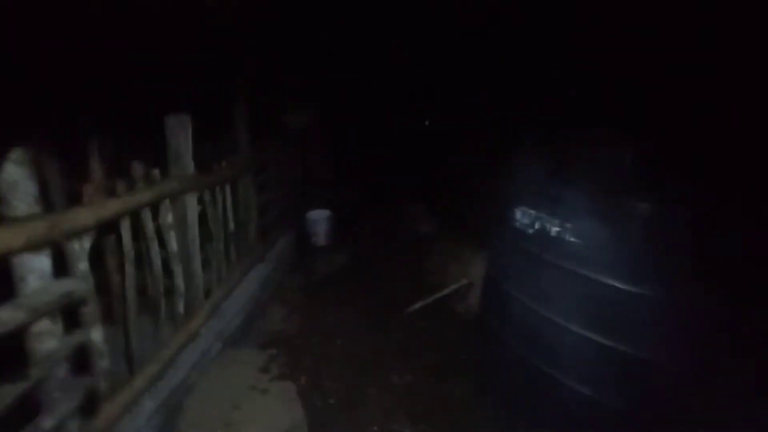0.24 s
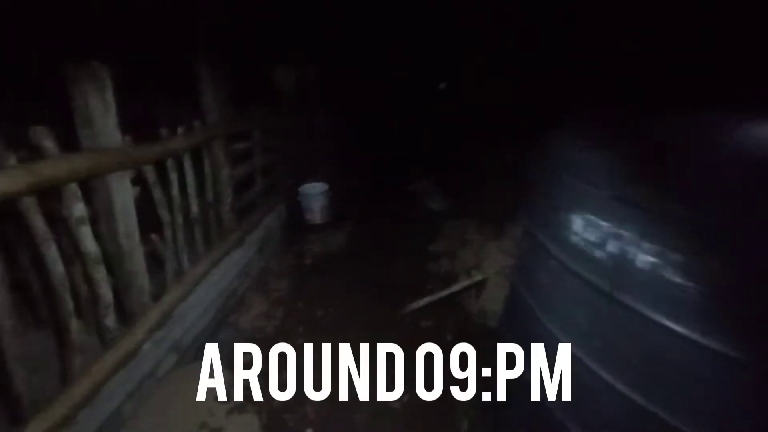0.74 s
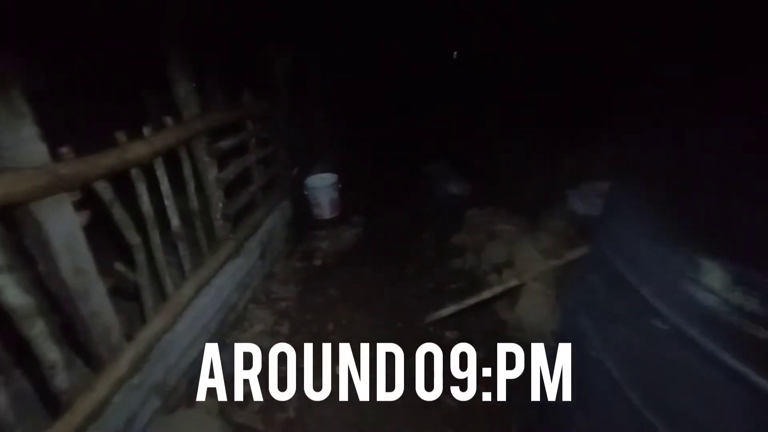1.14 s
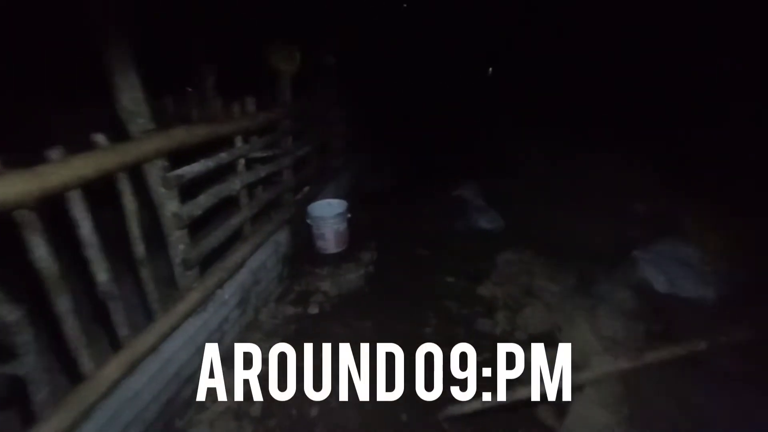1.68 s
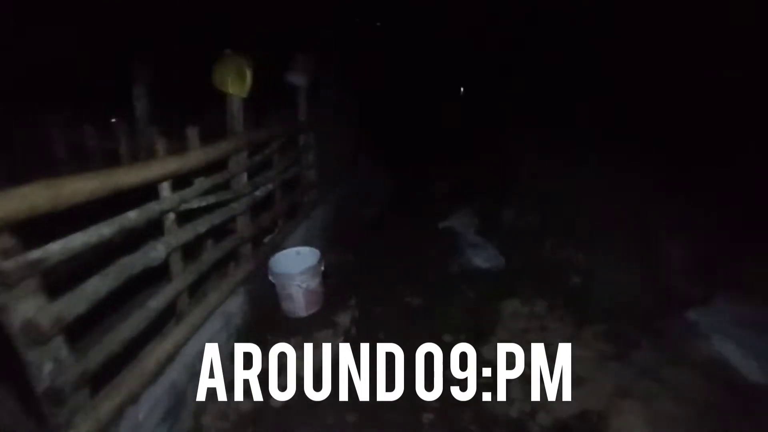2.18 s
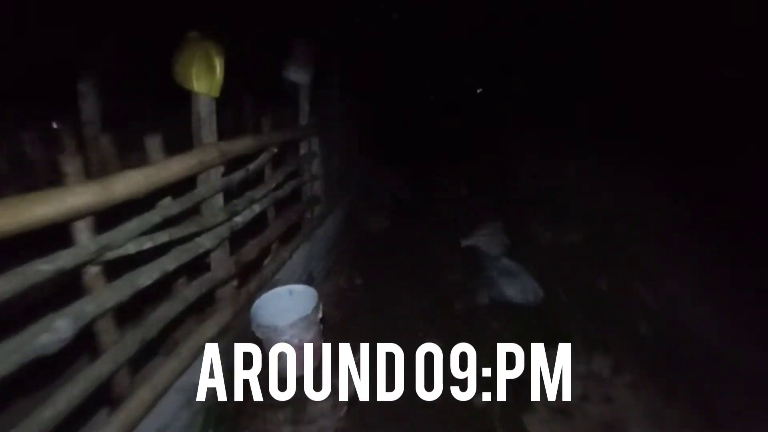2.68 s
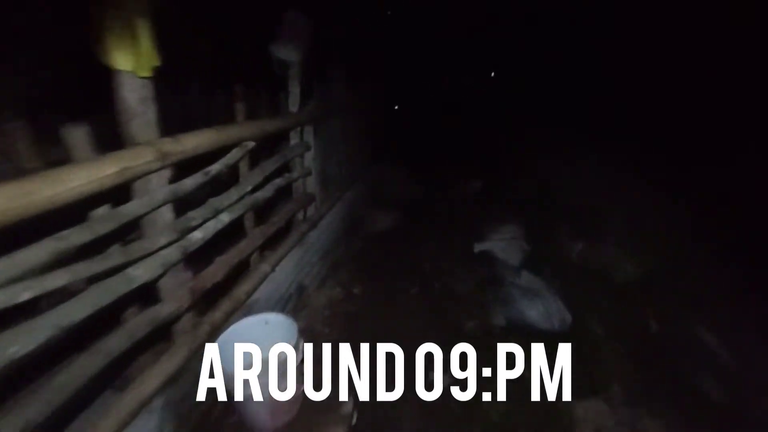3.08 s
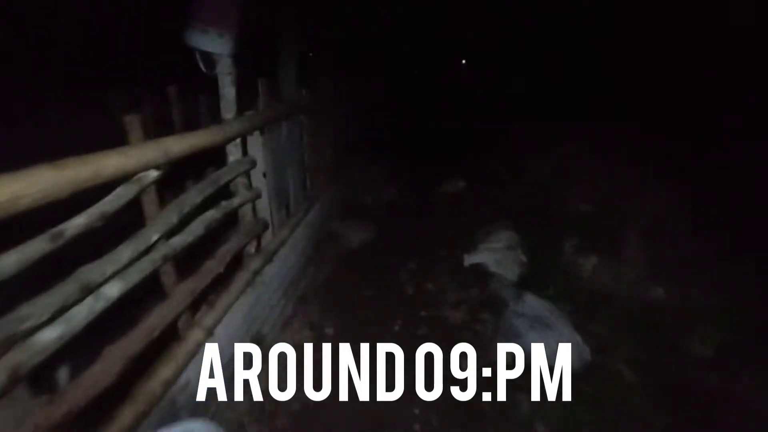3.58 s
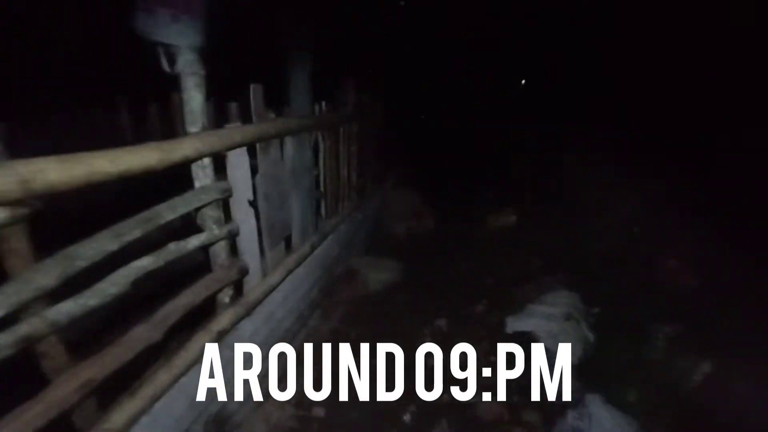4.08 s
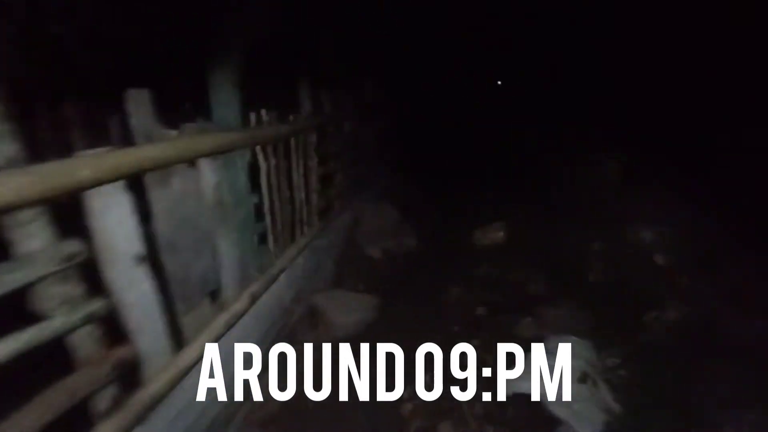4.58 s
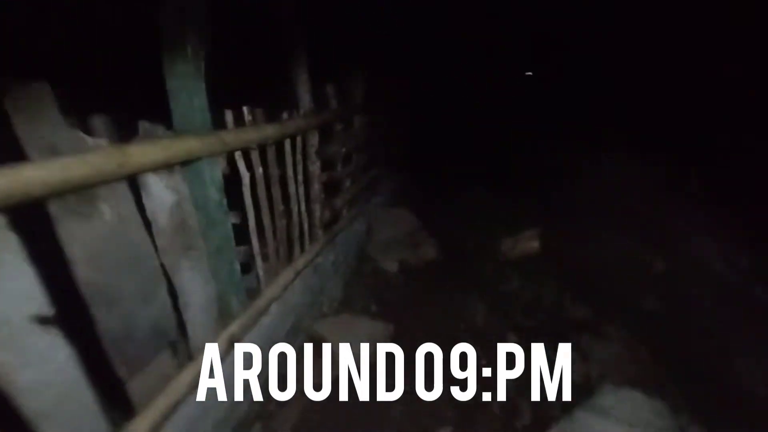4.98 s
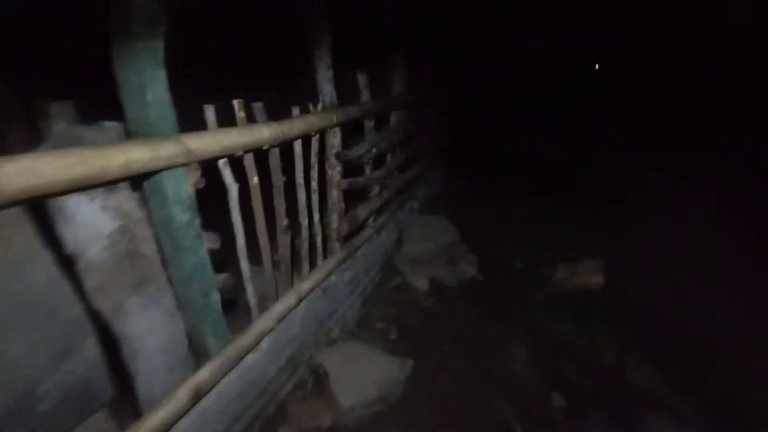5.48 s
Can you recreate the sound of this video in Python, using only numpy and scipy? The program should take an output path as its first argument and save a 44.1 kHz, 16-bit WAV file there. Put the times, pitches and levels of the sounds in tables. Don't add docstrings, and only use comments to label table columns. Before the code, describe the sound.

In a quiet outdoor pen at night, feet scuff gravel and stones click, thickest in the first second. A sow close to a small thin-sounding microphone grunts five times, low and flapping, with soft sniffs between. Another pig grumbles further off, most clearly just after three seconds. Faint crickets pulse throughout, and short echoes return from rails and wall.

```python
import sys
import numpy as np
from scipy import signal
from scipy.fft import rfft, irfft
from scipy.io import wavfile
from scipy.ndimage import uniform_filter1d

SR = 44100
rng = np.random.default_rng(int(sys.argv[2]) if len(sys.argv) > 2 else 0)


def convert_level_to_amplitude(level_db):
    exponent = np.asarray(level_db, float) / 20
    return 10 ** exponent


def int16_out(signal):
    q = np.round(np.clip(np.atleast_2d(signal).T, -1, 1) * 32767)
    wavfile.write(sys.argv[1], SR, q.astype(np.int16))


N = 253134


def evened(x):
    return x / np.sqrt(np.mean(x ** 2) + 1e-20)


def add(mix, s, sound):
    part = mix[round(s * SR):][:len(sound)]
    part += sound[:len(part)]


def spread(rows, tail=0.):
    s, *columns = np.transpose(rows)
    t = np.arange(s[0], s[-1] + tail, 1 / SR)
    return [t] + [np.interp(t, s, c) for c in columns]


def swell(start, length, rise_s, fall_s, sag_db, depth_db=20):
    t = np.arange(start, start + length, 1 / SR)
    rise_s = np.clip(rise_s, 0, length / 2)
    knees = start + np.array([0, rise_s, max(length - fall_s, rise_s), length])
    return t, (t - start) / length, np.interp(t, knees, [-depth_db, 0, -sag_db, -sag_db - depth_db])


def fade(t, s):
    return np.clip(np.minimum(t - t[0], t[-1] - t) / s, 0, 1)


def flicker(count, ms):
    span = int(ms * SR / 1000)
    return evened(uniform_filter1d(uniform_filter1d(rng.standard_normal(count), span), span))


def resonate(x, hz, width):
    r = np.exp(-np.pi * width / SR)
    if np.ndim(hz) == 0:
        return 2 * signal.lfilter([1 - r], [1, -r * np.exp(2j * np.pi * hz / SR)], x).real
    turn = np.exp(2j * np.pi * np.cumsum(hz) / SR)
    return 2 * (turn * signal.lfilter([1 - r], [1, -r], x / turn + 1e-18)).real


def resonate_twice(x, hz, width, skirt):
    return resonate(resonate(x, hz, width), hz, skirt)


def tract(x, modes):
    return sum(convert_level_to_amplitude(db) * resonate(x, hz, width) for hz, width, db in modes)


def band(x, lo_hz, hi_hz, order=2):
    edges = [lo_hz, min(hi_hz, SR / 2.1)]
    return evened(signal.sosfilt(signal.butter(order, edges, "bandpass", fs=SR, output="sos"), x))


# (f/Hz, level/dB per Hz)
NIGHT_SPECTRUM = [(24, -52), (40, -15.5), (213, -11), (975, -23.5), (1650, -14), (4000, -13.5),
                  (4360, 13.5), (4780, -30), (6490, -4.5), (7360, -25), (9440, -40), (12400, -33.5),
                  (15600, -46.5)]


def night():
    frames, hz = N // 256 + 5, np.fft.rfftfreq(1024, 1 / SR)
    a, b, patches = rng.standard_normal((frames, 513, 3)).T
    patches = evened(uniform_filter1d(uniform_filter1d(patches, 10, 0), 14, 1))
    f, db = np.transpose(NIGHT_SPECTRUM)
    colour_db = np.interp(np.log(hz + 1), np.log(f), db)[:, None]
    z = (a + 1j * b) * convert_level_to_amplitude(colour_db + 4.5 * patches)
    return convert_level_to_amplitude(-60) * evened(signal.istft(z, nperseg=1024, noverlap=768)[1][:N])


# (t/s, level/dB, wing pitch f/Hz)
CRICKET_PATH = [(0.0, -58.5, 4480), (.5, -81, 4180), (1.0, -52, 4267), (1.55, -64.5, 4543),
                (2.17, -60, 4030), (2.4, -55, 4140), (3.05, -70.5, 4660), (3.3, -107, 4770),
                (3.55, -59.5, 4265), (3.85, -51.5, 4230), (4.3, -65, 4540), (4.73, -69.5, 4610),
                (5.12, -58, 4114), (5.74, -62, 4446)]


def crickets(lift):
    t, db, hz = (np.resize(c, N) for c in spread(CRICKET_PATH, tail=.01))
    near = np.zeros(N)
    # detune ratio, strokes per second, level/dB
    for detune, rate, size_db in [(1.0, 52, 1), (.975, 110, -8), (1.022, 59, -2), (.99, 77, -1)]:
        turns = np.cumsum(rate * (1 + 0.021 * flicker(N, 54))) / SR
        stroke = np.sin(np.pi * np.clip((turns % 1) / 1.33, 0, 1))
        wing = evened(resonate_twice(rng.standard_normal(N), hz * detune, 60, 140))
        near += convert_level_to_amplitude(size_db + 2.0 * flicker(N, 73)) * stroke * wing
    chorus = resonate(resonate(rng.standard_normal(N), 6100, 300), 6620, 210) * convert_level_to_amplitude(1.9 * flicker(N, 10))
    return convert_level_to_amplitude(db + 0.98 * lift) * evened(near) + convert_level_to_amplitude(-77.5 + 9 * lift) * evened(chorus)


# (t/s, length/s, crunch level/dB, grit level/dB, fine dust level/dB)
SCUFFS = [(.008, 0.056, -53, -56, -66.5), (.428, 0.036, -65, -67, -65), (.15, 0.063, -51, -63, -74.5),
          (.7, 0.041, -39, -52, -60), (.755, 0.057, -46, -29, -48), (.865, .05, -56, -49, -69.5),
          (.925, 0.11, -48, -59, -75), (1.58, 0.074, -81, -62, -89), (1.705, 0.055, -65, -56, -77),
          (2.3, 0.033, -68, -87.5, -88), (2.355, .06, -70.5, -54, -84.5), (2.5, 0.054, -49, -65, -75.5),
          (3.03, 0.116, -65.5, -61.5, -73.5), (3.11, .13, -73, -82, -86), (3.72, 0.2, -49.5, -65, -83),
          (4.012, 0.091, -41, -40, -65.5), (4.292, 0.018, -82, -61, -59), (4.35, 0.092, -65, -88, -89.5),
          (4.473, 0.016, -57.5, -73, -90), (4.8, 0.088, -47, -47, -69.5), (5.07, 0.075, -73, -54, -81),
          (5.455, 0.013, -74, -71, -58), (5.69, 0.077, -48.5, -61.5, -91.5)]
# (t/s, length/s, crunch level/dB, grit level/dB, fine dust level/dB)
DRAGS = [(.05, 0.69, -55, -75, -101), (.355, 0.11, -48, -57.5, -72.5), (.56, 0.16, -52, -59.5, -75.5),
         (.79, 0.092, -53.5, -51.5, -82), (1.12, 0.19, -48.5, -53.5, -75.5), (1.34, 0.47, -60.5, -67, -79),
         (1.885, 0.22, -60.5, -68, -72.5), (2.58, 0.16, -58, -92, -83), (3.3, 1, -63.5, -76, -100),
         (4.26, 0.19, -86, -101.5, -82), (5.45, 0.43, -60, -70, -82)]


def scuff(start, length, crunch_db, grit_db, dust_db, rise, sag_db):
    t, along, db = swell(start, length, rise * length, 0.43 * length, sag_db, depth_db=13.0)
    hits = rng.random(len(t)) < 2500 / SR
    grains = convert_level_to_amplitude(0.42 * np.minimum(rng.exponential(1, len(t)), 5)) * hits
    grains = (evened(grains) + 0.82) * rng.standard_normal(len(t)) * convert_level_to_amplitude(2.2 * flicker(len(t), 10))
    patches = sum(resonate_twice(grains * convert_level_to_amplitude(7.1 * flicker(len(t), 16)), hz, 170, 640)
                  for hz in np.geomspace(1050, 3700, num=11))
    crunch = evened(evened(patches) + 0.68 * band(grains, 1320, 2590, order=3))
    grit = band(grains, 4790, 6710, order=4) + 0.056 * band(grains, 6200, 15000)
    dust = band(grains, 6900, 23000, order=3)
    thud = band(rng.standard_normal(len(t)) * convert_level_to_amplitude(5.0 * flicker(len(t), 20)), 110, 400)
    gravel = convert_level_to_amplitude(crunch_db) * crunch + convert_level_to_amplitude(grit_db) * grit + convert_level_to_amplitude(dust_db) * dust
    gravel = gravel + convert_level_to_amplitude(crunch_db - 20.5) * thud
    return t[0], gravel * convert_level_to_amplitude(db) * fade(t, 0.011)


# (t/s, peak level/dB, ring f/Hz, upper ring f/Hz, brightness level/dB)
KNOCKS = [(0.0365, -30, 2150, 3000, -16), (0.1571, -34.5, 1780, 2700, -24), (0.208, -37, 2070, 3300, -18),
          (0.432, -20, 3600, 2860, 3), (0.6859, -26.5, 2060, 2840, -38), (0.7197, -27, 2670, 3370, -28),
          (0.887, -37, 1500, 3270, -28), (1.354, -45.5, 2630, 3080, -30), (1.4116, -43, 1840, 2420, -32),
          (1.486, -34.5, 1530, 2980, -7), (1.575, -44.5, 3360, 3600, -35.5),
          (1.712, -36.5, 1680, 2290, -36.5), (1.842, -46, 1800, 3230, -23.5),
          (1.952, -33.5, 2270, 2780, -8), (1.962, -40.5, 1500, 2650, -25), (2.0534, -44, 1620, 1830, -31.5),
          (2.3645, -36.5, 2070, 3870, -5.5), (2.3781, -27.5, 1770, 1940, -36),
          (2.5354, -29, 1710, 3000, -31), (3.037, -47, 2300, 3420, -27), (3.094, -35.5, 2250, 3280, -31),
          (3.267, -49, 1670, 3280, -14), (4.271, -45, 1720, 3600, -13), (4.2962, -51, 1680, 3000, -21),
          (4.8286, -28, 1520, 2450, -31), (5.479, -41, 1770, 4300, -29), (5.5498, -42.5, 2450, 3080, -30)]


def knock(s, db, hz, upper_hz, bright_db):
    t = np.arange(int(.15 * SR)) / SR
    crack = rng.standard_normal(len(t)) * (convert_level_to_amplitude(-60 * t / 0.022) + 0.058 * convert_level_to_amplitude(-60 * t / 0.31))
    crack[0] = 6
    ring = resonate(crack, hz, 120) + resonate(crack, upper_hz, 280)
    ring = ring + 0.23 * resonate(crack, np.sqrt(hz * upper_hz), 240)
    ring = band(evened(ring) + 0.16 * band(crack, 1800, 6300), 1000, 3770, order=4)
    ring = ring + convert_level_to_amplitude(min(bright_db, 3)) * band(crack, 3800, 5950, order=5)
    return s, convert_level_to_amplitude(db) * ring / abs(ring).max()


# (t/s, length/s, level/dB, sag/dB)
GRUMBLES = [
    (0.043, 0.17, -56, 2.5),
    (0.279, .21, -57, 1),
    (2.525, 0.21, -66, 19),
    (3.309, .085, -41, 2),
    (3.366, 0.17, -40.5, 13),
    (3.52, .25, -47, 20.5),
    (5.626, 0.16, -58, -6.5),
]
# (jaw f/Hz, mouth f/Hz, snout f/Hz, mouth level/dB, snout level/dB)
JAWS = [(494, 1170, 1540, -3.5, -9), (514, 870, 1450, -9, -4), (680, 810, 1550, -5.5, 18.5),
        (600, 714, 1860, -0.5, -9), (560, 826, 1740, 1.5, -9), (523, 820, 1610, 4, -1),
        (550, 1180, 1694, 2.5, 1.5)]
CREAK = [.35, .4, .2, .3, .35, .3, .15]
CLOSING = [-0.04, 0.35, -0.0057, -0.023, 0.15, .04, .02]


def grumble(start, length, level_db, sag_db, jaw_hz, mouth_hz, snout_hz, mouth_db, snout_db, creak, closing):
    t, along, db = swell(start, length, 0.02, 0.034, sag_db, depth_db=7.5)
    shut = 1 + closing * (.5 - along)
    turns = np.cumsum(88 * (1 + .3 * flicker(len(t), 8.7))) / SR
    snaps = np.diff(np.floor(turns), prepend=0) * convert_level_to_amplitude(2.5 * rng.standard_normal(len(t)))
    gate = 1 - creak + creak * np.exp(-(turns % 1) / 0.31)
    drive = creak * evened(snaps) + (1 - creak) * evened(gate * rng.standard_normal(len(t)))

    def cavity(hz, width):
        push = drive * convert_level_to_amplitude(3.5 * flicker(len(t), 10))
        return evened(resonate(resonate(push, hz * (1 + .035 * flicker(len(t), 30)), width), hz, 3.0 * width))

    jaw = cavity(jaw_hz * shut, 90)
    mouth = cavity(mouth_hz, 120)
    high = cavity(snout_hz * shut, 130)
    body = 0.33 * band(drive, 630, 1210, order=3)
    voice = jaw + body - convert_level_to_amplitude(mouth_db) * mouth + convert_level_to_amplitude(snout_db) * band(high, 1000, 3200)
    return t[0], convert_level_to_amplitude(level_db + db) * voice * fade(t, 0.0046)


# (t/s, length/s, level/dB, first nostril f/Hz, last nostril f/Hz)
SNIFFS = [
    (0.491, 0.27, -52, 822, 1250),
    (2.089, 0.16, -46, 880, 1120),
    (4.009, 0.23, -48, 990, 860),
    (4.711, 0.22, -47.5, 747, 710),
    (5.255, 0.19, -48.5, 1060, 875),
]
# (rise/s, sag/dB, mid hiss level/dB, high hiss level/dB, low chuff level/dB)
HISSES = [(0.049, 4, -12, -12, -34), (0.079, 4, -10, -13.5, -28), (0.018, 4, -3, -6.5, -8),
          (0.047, 2, -5, -14.5, -10), (0.039, 3.5, -6.5, -5, -13)]


def sniff(start, length, level_db, first_hz, last_hz, rise_s, sag_db, mid_db, high_db, chuff_db):
    t, along, db = swell(start, length, rise_s, 0.047, sag_db, depth_db=7.5)
    hz = first_hz + (last_hz - first_hz) * along
    high_db = high_db - 2.5 * along
    air = rng.standard_normal((4, len(t))) * convert_level_to_amplitude(2.4 * flicker(len(t), 2.6))
    nostril = evened(resonate_twice(air[0], hz, 350, 1100))
    nostril = nostril + 1.3 * band(air[1], 650, 1530, order=3) + 0.033 * band(air[1], 110, 1000)
    high = 0.45 * band(air[3], 5500, 6120, order=4) + 0.92 * band(air[3], 4840, 6780, order=4)
    high = high + convert_level_to_amplitude(-20) * band(air[3], 8600, 18000, order=3)
    hiss = convert_level_to_amplitude(mid_db) * band(air[2], 1400, 3880, order=3) + convert_level_to_amplitude(high_db) * high
    hiss = hiss + convert_level_to_amplitude(chuff_db) * band(air[0], 143, 420)
    return t[0], convert_level_to_amplitude(level_db + db) * (evened(nostril) + hiss) * fade(t, 0.021)


# (t/s, length/s, level/dB, first pitch
# f/Hz, last pitch f/Hz)
HUMS = [
    (0.71, 0.065, -41, 386, 323),
    (0.752, 0.054, -32, 209.3, 205),
    (0.943, 0.12, -37.5, 303, 300.5),
    (2.701, 0.078, -40, 303.5, 306),
    (3.767, 0.075, -31, 303.5, 349.4),
    (.72, .07, -45, 560, 527),
    (3.308, .05, -41, 600, 685),
    (3.364, 0.041, -39.5, 852, 830),
]


def hum(start, length, level_db, first_hz, last_hz):
    t, along, db = swell(start, length, 0.0087, 0, 9.5, depth_db=1)
    hz = first_hz + (last_hz - first_hz) * along
    turn = 2 * np.pi * np.cumsum(hz * (1 + 0.046 * flicker(len(t), 3.3))) / SR
    tone = np.sin(turn) + convert_level_to_amplitude(-14.5) * np.sin(3 * turn)
    return t[0], convert_level_to_amplitude(level_db + db + 2.0) * tone * fade(t, 0.023)


# (snout level/dB, chest level/dB, air leak 0-1, dying away/dB per s,
# level of the first steady flap/dB)
GRUNTS = [
    (-32.5, -37.5, 0.22, 901.5, -13),
    (-32.5, -41.5, 0.49, 500.5, -5.5),
    (-31.5, -42.5, 0.31, 300, -1.5),
    (-27, -31, 0.15, 600, 3),
    (-29.5, -33, 0.23, 330, 4),
]
# (opening pop t/s, first steady flap t/s, last flap t/s, first rate f/Hz, last rate f/Hz)
FLAPS = [(.73, .75, .785, 250, 200), (.975, 1.0147, 1.11, 58.5, 55), (2.7034, 2.7665, 2.88, 55.6, 54.4),
         (3.7891, 3.8313, 3.965, 66, 57), (4.9167, 4.968, 5.048, 63, 71)]
# (f/Hz, width/Hz, level/dB)
SNOUTS = [
    [(1080, 51, 13.5), (1530, 110, 4), (2400, 840, 6.5), (3280, 420, 6.5), (4160, 470, -54),
     (7900, 11000, -45)],
    [(930, 140, -16.5), (1340, 410, -20), (2020, 200, -0.5), (2425, 122, -7.5), (2910, 62, -5),
     (3500, 560, -8.5)],
    [(820, 1100, -10), (1250, 780, -6.5), (1940, 270, 1), (2450, 500, 7), (3000, 170, 3), (3620, 210, 2.5)],
    [(884, 390, -12), (1510, 83, -14.5), (2050, 83, 21), (2470, 464, 4.5), (3690, 240, 12.5),
     (4600, 370, -13.5)],
    [(926, 120, -30.5), (1314, 110, 10.5), (1840, 170, 15), (2285, 82, 13.5), (2840, 120, 8),
     (3600, 220, -25)],
]
# (f/Hz, width/Hz, level/dB)
CHEST = [(61.3, 9, -29), (137, 19, -8), (205, 47, 0), (303, 72, 0), (560, 200, -14.5)]
# (f/Hz, width/Hz, level/dB)
RIBS = [(230, 40, -10), (302, 36, -3), (290, 36, -4), (289.3, 35, 7), (266.6, 40, 6)]
CHEST_TILT_DB = [6.5, -15, -11, 12, 4.5]
CHEST_DAMP = [0.6, 0.87, 1.07, 0.9, 0.54]
LOOSE_HZ = [250, 58, 75, 101, 59]
LOOSE_DB = [-5.5, -7.5, -5.5, -7, -3]
POPS_DB = [-1, -12.5, -0.5, 6.5, -7]
LIPS_DB = [-62, -63, -53.5, -53.5, -60.5]
TEETH_DB = [-43, -17, -18.5, -33, -31.5]
THIN = [0.068, 0.14, 0.097, 0.59, 0.15]
CLICKS_DB = [-17, -11, -9, -3.5, -19.5]
ARCH_DB = [4, 3, -0.5, 0, 1.5]


def grunt(row, flaps, snout, tilt_db, loose_hz, lips_db, pop_db, teeth_db, thin, click_db, arch_db, damp,
          loose_db, rib):
    full_db, low_db, share, dying, swell_db = row
    pop, first, last, rate, end_rate = flaps
    snout = [(hz, max(width, 125), db) for hz, width, db in snout]
    top_hz = snout[-1][0]
    tail_db = 35
    t, snout_db, chest_db, leak = spread([
        (pop - .004, full_db - 17, low_db - 12.5, 0.53),
        (first - .002, full_db - 6, low_db - 12.5, 0.53),
        (first, full_db + swell_db, low_db + 0.22 * swell_db, share),
        ((first + last) / 2, full_db + swell_db / 2 + arch_db, low_db + 0.17 * swell_db, share),
        (last, full_db, low_db, share),
        (last + tail_db / dying, full_db - tail_db, low_db - 0.99 * tail_db, 0.84)])

    turns = np.cumsum(np.interp(t, [first, last], [rate, end_rate]) * (t >= first) * (t <= last)) / SR
    steady = np.diff(np.ceil(turns), prepend=0) * convert_level_to_amplitude(0.97 * rng.standard_normal(len(t)))
    snaps = steady.copy()
    for s in [pop, *np.arange(first - 1 / loose_hz, pop + .8 / loose_hz, -1 / loose_hz)]:
        flap_db = full_db + loose_db + pop_db * (s == pop)
        snaps[round((s - t[0]) * SR)] = convert_level_to_amplitude(flap_db - np.interp(s, t, snout_db))

    air = rng.standard_normal(len(t))
    puff = np.exp(-np.arange(800) / (.0024 * SR))
    alike = np.convolve(snaps, puff * air[-800:])[:len(t)]
    puffs = .85 * alike + .4 * np.convolve(snaps, puff)[:len(t)] * air
    drive = 6 * snaps + puffs
    drive = drive / np.sqrt(np.mean(drive[(t > first - .001) & (t < last)] ** 2))

    leak = np.clip(leak, 0, 1)
    gusts = air * (0.98 + 2.1 * np.convolve(steady, np.exp(-np.arange(800) / (0.0053 * SR)))[:len(t)])
    upper = band(tract((1 - leak) * drive + leak * gusts, snout), 560, 0.71 * top_hz)
    upper = band(upper, 640, max(4650, top_hz), order=8)
    held = np.clip(thin, 0, 1) * np.clip((first + 0.019 - t) / 0.021, 0, 1)
    upper = (1 - held) * upper + held * band(upper, 2900, 3940, order=3)
    click = np.convolve(snaps, puff * (air[:800] + 5 * (puff == 1)))[:len(t)]
    upper = upper + convert_level_to_amplitude(click_db) * band(click, 2385, 4470, order=6)

    specks = snaps * (t >= first + .005) * convert_level_to_amplitude(6 * np.clip(air, -2, 1))
    spit = np.convolve(specks, puff ** 2 * air[:800])[:len(t)]
    lips = band(spit + .002 * air, 12000, 13500, order=1)
    teeth = band(drive + 0.41 * air, 5840, 6730, order=4)
    whistle = convert_level_to_amplitude(teeth_db) * teeth + convert_level_to_amplitude(lips_db) * lips

    chest = [(hz, damp * width, db + tilt_db * np.log2(hz / 260)) for hz, width, db in CHEST] + [rib]
    push = signal.lfilter([1], [1, -np.exp(-1 / (.0004 * SR))], .7 * steady + .3 * snaps)
    breath = evened(signal.lfilter([1], [1, -.9], air))
    lower = band(tract(evened(push) + 3.6 * leak * breath, chest), 63, 540, order=3)
    return t[0], (convert_level_to_amplitude(snout_db) * (upper + whistle) + convert_level_to_amplitude(chest_db) * lower) * fade(t, 0.0066)


def pen(x, t60):
    at = np.arange(200, SR // 2, 22)
    taps = np.zeros(SR // 2 + 22)
    signs = rng.choice([-1., 1.], len(at))
    taps[at + rng.integers(0, 22, len(at))] = signs * convert_level_to_amplitude(-60 * at / SR / t60)
    return signal.fftconvolve(x, taps / np.linalg.norm(taps))[:N]


def scene():
    sow, far, ground = np.zeros((3, N))
    for rows, rise, sag_db in [(SCUFFS, 0.2, 6.5), (DRAGS, 0.17, 4)]:
        for row in rows:
            add(ground, *scuff(*row, rise, sag_db))
    for row in KNOCKS:
        add(far, *knock(*row))
    for row, jaw, creak, closing in zip(GRUMBLES, JAWS, CREAK, CLOSING):
        add(far, *grumble(*row, *jaw, creak, closing))
    for row, hiss in zip(SNIFFS, HISSES):
        add(sow, *sniff(*row, *hiss))
    for row in HUMS:
        add(sow, *hum(*row))
    for parts in zip(GRUNTS, FLAPS, SNOUTS, CHEST_TILT_DB, LOOSE_HZ, LIPS_DB, POPS_DB, TEETH_DB, THIN,
                     CLICKS_DB, ARCH_DB, CHEST_DAMP, LOOSE_DB, RIBS):
        add(sow, *grunt(*parts))
    echoes = convert_level_to_amplitude(-5.5) * pen(sow, 0.14) + convert_level_to_amplitude(-4.0) * pen(far, 0.14)
    close = sow + far + echoes + ground
    loud_db = 10 * np.log10(abs(uniform_filter1d(close ** 2, size=4000)) + 1e-12)
    lift = np.clip((loud_db + 54.5) / 22, 0, 1)
    return (close + crickets(lift) + night())[None]


def band_limit(x):
    return signal.sosfilt(signal.butter(12, 15700, fs=SR, output="sos"), x)


# (f/Hz, level/dB)
MICROPHONE = [(0, -36), (70, 0.5), (7000, -3.5), (8000, 2), (11300, -8), (12400, 4)]


def record(dry):
    mic_hz, mic_db = np.transpose(MICROPHONE)
    hz = np.fft.rfftfreq(N, 1 / SR)
    colour = convert_level_to_amplitude(np.interp(hz, mic_hz, mic_db)) * (hz < 15650)
    return band_limit(irfft(rfft(dry) * colour, N))


dry = scene()
out = record(dry)
int16_out(out)
```